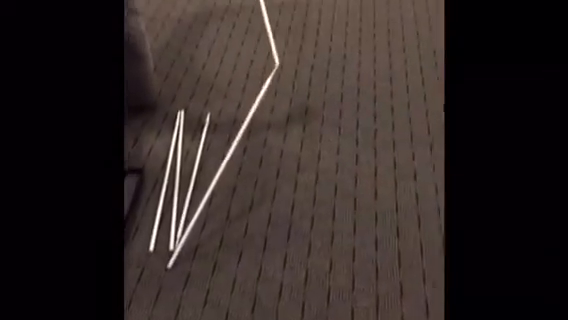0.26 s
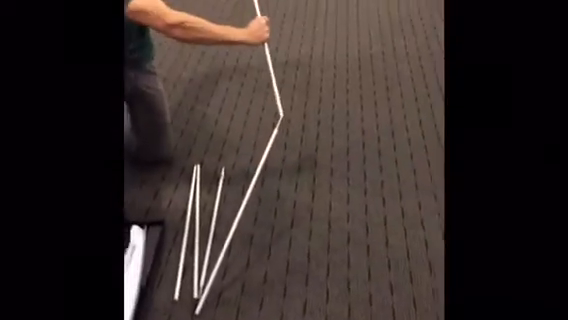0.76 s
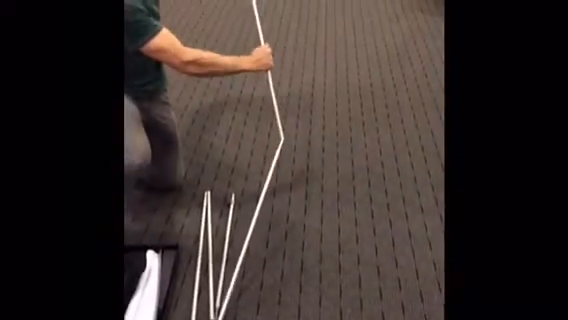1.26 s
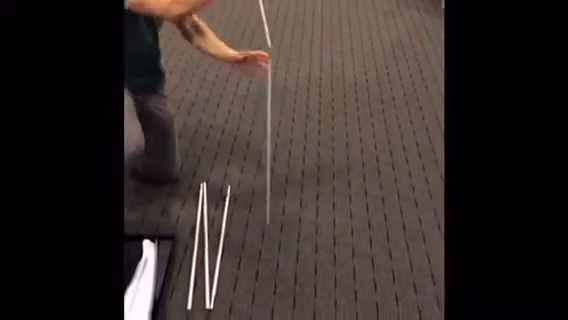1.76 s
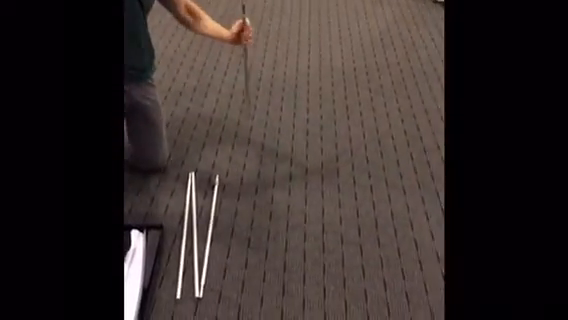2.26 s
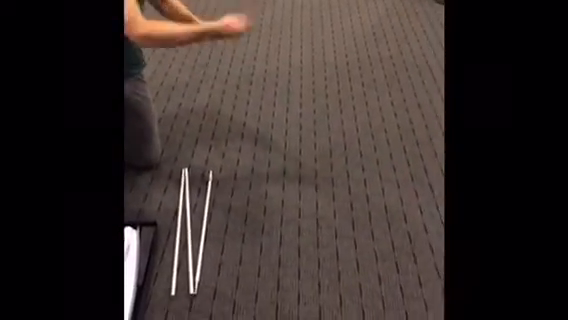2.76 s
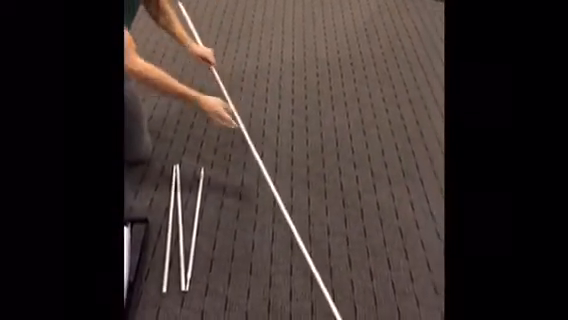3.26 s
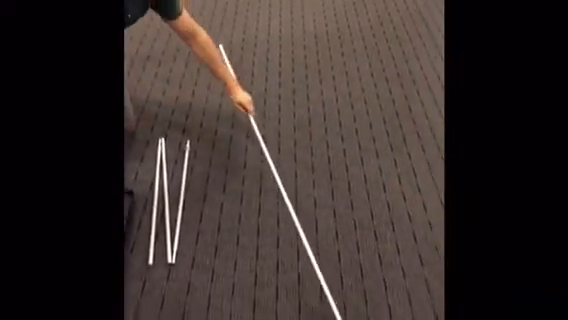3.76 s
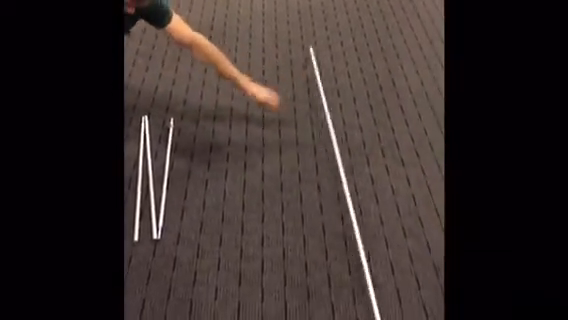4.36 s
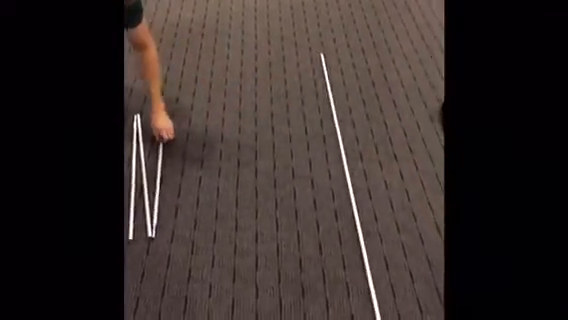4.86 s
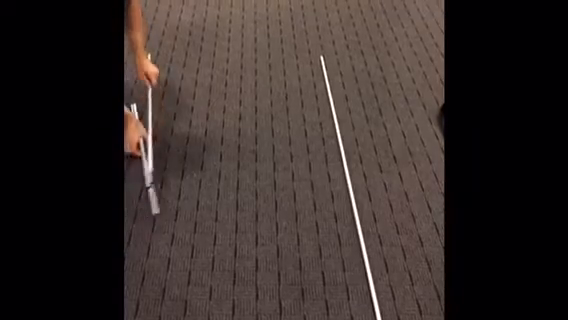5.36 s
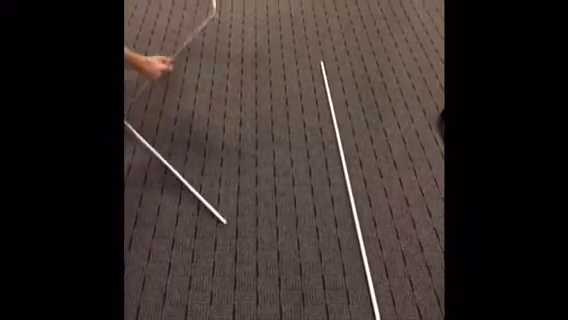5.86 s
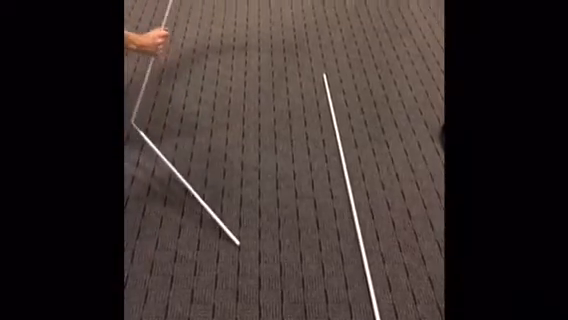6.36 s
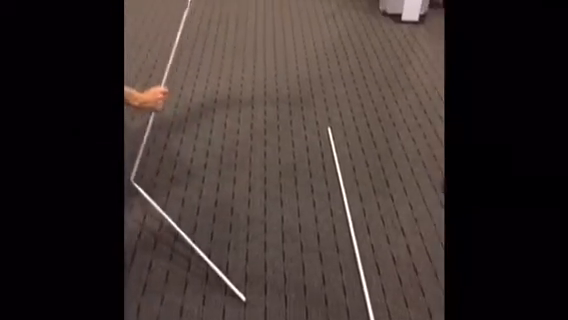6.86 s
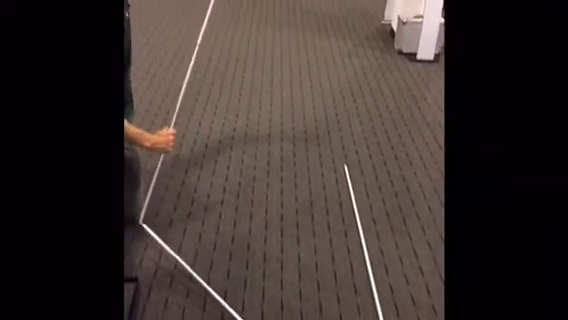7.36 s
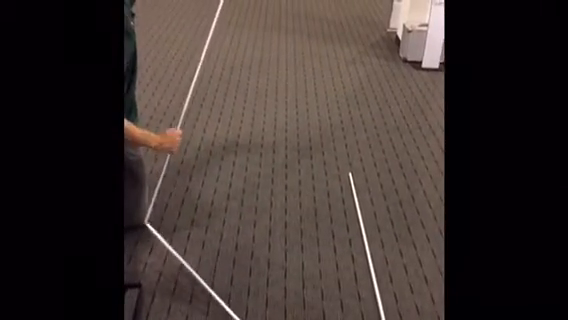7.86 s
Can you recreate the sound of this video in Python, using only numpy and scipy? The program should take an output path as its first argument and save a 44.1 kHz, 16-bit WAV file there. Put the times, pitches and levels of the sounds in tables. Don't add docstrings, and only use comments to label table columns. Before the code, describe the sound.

Thin metal tube sections snap together with sharp bright clicks, a dropped pole chatters on carpet, over steady low ventilation hum indoors.

```python
import sys
import numpy as np
from scipy import signal
from scipy.fft import rfft, irfft, next_fast_len
from scipy.io import wavfile
from scipy.ndimage import minimum_filter1d, map_coordinates

SR = 44100
rng = np.random.default_rng(int(sys.argv[2]) if len(sys.argv) > 2 else 0)


def boost(x):
    u = np.asarray(x, float) / 20
    return 10 ** u


def file_out(sig):
    cols = np.atleast_2d(sig).T
    lim = np.clip(cols, -1, 1)
    pcm = np.round(lim * 32767).astype(np.int16)
    wavfile.write(sys.argv[1], SR, pcm)


N = 358533

# (frequency [Hz], density [dB per Hz])
VENTILATION_SPECTRUM = [(12, -63), (20, -35), (50, -6.5), (123, -5.5), (182, -8.5), (204, -13.5), (234, -9),
                        (270, -13.5), (357, -20), (624, -29), (1370, -33), (2200, -39.5), (3630, -48.5),
                        (7310, -56), (14700, -66.5), (16000, -81.5)]
# (frequency [Hz], level [dB rms], width [Hz])
MAINS_LINES = [(120.14, -41, 1.7), (176.5, -44.5, 1.2), (239.5, -49.5, 2.6), (348.1, -52, 0.6),
               (362, -55.5, 0.67), (7250, -82.5, 25), (7885, -83, 50)]
# (frequency [Hz], density [dB per Hz])
CLOTH_SPECTRUM = [(1500, -29.5), (4000, -7), (8000, -2), (13000, -3.5), (16000, -6)]
# (fastest [s], level [dB], speeding up [s], slowing down [s])
ARM_MOVES = [
    (1.3, -69.5, .25, .6),
    (3, -67.5, .5, .25),
    (3.7, -70, .35, .4),
    (5.35, -64, .35, .3),
    (6.05, -63.5, .35, 0.18),
    (8.12, -52, .04, .04),
]
# (frequency [Hz], level [dB])
IMPACT_SPECTRUM = [(500, -38.5), (1000, -21.5), (2000, -7), (3500, -4.5), (6000, -2), (9000, -8.5),
                   (13000, -15.5), (16000, -29.5)]
# (frequency [Hz], level [dB], t60 [s])
GRIPPED_MODES = [(1160, -15.5, 0.067), (1775, -10.5, 0.23), (1766, -8, 0.14), (2387, -4.5, 0.55),
                 (2436, -11.5, 0.14), (2985, -10, .1), (3203, 7.5, 0.14), (3350, -1, 0.17), (3950, 1, 0.35),
                 (4215, -15, 0.068), (4750, -20.5, 0.09), (5380, -10, 0.18), (5308, 0, 0.3),
                 (5800, -6.5, 0.13), (7310, -6, .15), (8500, -7, 0.18), (9460, -5, 0.11),
                 (10600, -13, 0.16), (12190, -26, 0.065)]
# (time [s], level [dB], low band [dB], high band [dB], rattle length [s])
SLEEVE_JOINTS = [(0.1444, -29.5, -11, -14.5, 0.02), (1.1113, -38, -18, -9, 0.037),
                 (1.121, -32.5, -15, -16, 0.016), (1.176, -34, -16, -17, .035),
                 (1.199, -34, -9, -12.5, 0.041), (1.2027, -15, -16, -6, 0.025),
                 (1.278, -27.5, -11.5, -16.5, 0.068), (2.574, -46.5, -2.5, -8, 0.089),
                 (2.59, -42, -11.5, -15, 0.034), (2.604, -4.5, -30, -4, 0.0066),
                 (2.607, -14.5, -9, -4, 0.021), (2.638, -33.5, -2, 1.5, .069),
                 (2.6599, -19.5, -16, 3, 0.011), (2.733, -27.5, -4, -1.5, 0.054),
                 (7.217, -20.5, -10.5, -11, 0.011), (7.745, -44, -12, -8, .08)]
# (time [s], level [dB], low band [dB], high band [dB])
FLOOR_STRIKES = [(4.3862, -46, -12, -8), (4.4078, -10, -15.5, -14), (4.424, -18.5, -16, -4),
                 (4.43, -16.5, -10.5, -13), (4.437, -18.5, -9.5, -12.5), (4.482, -32, 8.5, -14.5),
                 (4.5078, -27, -1.5, -1), (4.546, -25.5, -5.5, -15), (4.57, -28, -3.5, -12.5),
                 (4.578, -28, -14.5, -29), (4.62, -14, -27, -15), (4.6473, -14.5, -18, -9),
                 (4.667, -15.5, -23, -21), (4.675, -21, -6, -14), (4.7311, -15, -12, -17),
                 (4.745, -20.5, -11, -5), (4.782, -25.5, -9.5, -21.5)]
# (time [s], level [dB], high band [dB])
HAND_TAPS = [(1.15, -46, -16), (1.7345, -61, 0), (1.748, -61, -2), (1.759, -64, 8), (1.818, -44, -16),
             (2.139, -60, -27), (2.418, -45.5, -21), (2.4777, -51, -9), (3.1747, -48, -19.5),
             (3.5402, -40.5, -8.5), (3.565, -56, 1.5), (3.72, -62, -1), (3.7581, -51.5, -11),
             (3.9284, -56.5, -29), (5.016, -59.5, -37.5), (5.1098, -53.5, -26), (5.3482, -54.5, -28),
             (5.385, -54, -22.5), (5.407, -44.5, -23), (5.419, -41, -15), (5.437, -40.5, -16),
             (5.583, -39, -19.5), (5.619, -47, -21), (6.0601, -61.5, -10.5), (6.3954, -61, -21),
             (6.8014, -52, -24), (6.8952, -57, -26), (7.6605, -59, -20.5)]
# (first tick [s], first gap [s], next gap over it [ratio], level [dB])
CORD_SLIPS = [
    (1.39, .046, 1.15, -55),
    (5.862, .035, 1.4, -63.5),
]
# (time [s], level [dB], frequency [Hz], t60 [s])
MODE_PINGS = [(1.283, -30, 3253, 0.16), (5.585, -37, 3230, 0.061), (1.282, -34, 1800, 0.1),
              (2.14, -50, 2660, 0.061), (2.479, -55, 4118, .05), (2.605, -19, 2480, 0.06),
              (2.661, -39, 2430, 0.18), (3.175, -40, 3140, .06), (3.175, -44, 4900, 0.047),
              (3.929, -57, 4870, .05), (4.409, -17, 3182, 0.11), (4.408, -18, 4215, .067),
              (4.634, -23, 4215, .14), (4.629, -23, 2985, .12), (4.951, -46, 3510, .08),
              (5.009, -47, 3140, 0.1), (5.011, -52.5, 4408, .1), (5.109, -49.5, 3170, .05),
              (5.41, -41, 5340, .05), (5.422, -38, 3240, .07), (5.438, -40, 6201, .06),
              (5.437, -55, 2300, .06), (6.396, -54, 3320, 0.043), (6.802, -41, 3300, .035),
              (7.218, -30.5, 2440, 0.044), (1.205, -26.5, 1114, .03)]
# (time [s], level [dB], frequency [Hz], t60 [s])
SOFT_KNOCKS = [
    (1.205, -29.5, 1090, 0.051),
    (4.409, -30.5, 449, .18),
    (4.411, -23.5, 190, 0.46),
    (4.62, -31, 250, 0.31),
    (4.731, -35.5, 293, 0.24),
    (7.218, -38, 995, 0.034),
    (.148, -33.5, 1100, 0.04),
]
# (time [s], level [dB], time to settle [s])
POLE_BOUNCES = [
    (4.409, -24.5, 0.24),
    (4.621, -17, 0.14),
    (4.732, -30, 0.11),
]
# (frequency [Hz], width [Hz], level [dB])
JOINED_MODES = [(1720, 120, -13), (2390, 130, -1.5), (2985, 130, 0.5), (3300, 85, 4.5), (4215, 130, 1),
                (4600, 150, -6), (5260, 160, -11.5), (6400, 270, -4.5), (7040, 270, -10), (8430, 400, -12)]
# (time [s], level [dB], rattle t60 [s], ring [dB])
FREE_SNAPS = [
    (7.7638, -9, 0.2, -0.5),
]
# (frequency [Hz], level [dB], t60 [s])
FREE_MODES = [(710, -23, 0.069), (1163, -12, 0.048), (1730, -21.5, 0.61), (1737, 4.5, 0.064),
              (2020, -17, 0.12), (2360, -8, 0.22), (2420, -1, 0.13), (2837, -16, .2), (3170, -12.5, 0.23),
              (3180, -7.5, 0.19), (3760, -18, 0.145), (3980, -24, 0.6), (4120, 8.5, 0.09), (4300, -21, .15),
              (4650, -20, .15), (5150, -18, 0.4), (5954, -19, 0.34), (7120, -1.5, 0.21), (8250, -13, 0.33),
              (9300, -15, 0.31), (10520, -15, .22), (12190, -26, 0.13)]
# (frequency [Hz], t60 [s])
ROOM_DECAY = [(500, 0.98), (2000, .6), (5000, 0.39), (10000, 0.34), (16000, 0.16)]

JOINT_RING_DB, STRIKE_RING_DB, TAP_RING_DB = -21.5, -14.5, -13
STRIKE_S, DOUBLES_DB = 0.014, 12.5
TAP_LOW_DB, TAP_S = -5, 0.027
SLIP_LOW_DB, SLIP_HIGH_DB, SLIP_S = 2, -5, 0.036
SLIP_FADE_DB = 0.7


def unit(x):
    return x / np.sqrt(np.mean(x ** 2) + 1e-20)


def along(points, hz):
    f, value = np.transpose(points)
    return np.interp(np.log(hz + 1), np.log(f + 1), value)


def wobble(rate, size):
    knots = rng.standard_normal(size // 16)[:int(size * rate / SR) + 4]
    return map_coordinates(knots, [np.arange(size) * rate / SR])


def noise(gain, size):
    m = next_fast_len(size)
    spectrum = rfft(rng.standard_normal(m)) * gain(np.fft.rfftfreq(m, 1 / SR))
    return unit(irfft(spectrum, m)[:size])


def add(track, s, sound):
    part = track[round(s * SR):][:len(sound)]
    part += sound[:len(part)]


def onset(t, rise_s):
    return 1 - np.exp(-t / rise_s)


def ringing(modes, t, scatter_db):
    hz, db, t60 = np.transpose(modes)
    phase = np.exp(2j * np.pi * rng.random(len(hz)))
    strength = boost(db + scatter_db * rng.standard_normal(len(hz))) * phase
    decaying = np.exp(np.outer(t, 2j * np.pi * hz - np.log(1000) / t60))
    return (decaying @ strength).imag * onset(t, 0.00084)


def rattle(colour, size, lumpy_db):
    blows = noise(lambda f: boost(along(IMPACT_SPECTRUM, f) + along(colour, f)), size)
    return unit(boost(lumpy_db * wobble(1100, size)) * blows)


def ventilation():
    level = boost(-36 + 0.65 * wobble(2.3, N))
    hum = level * noise(lambda f: boost(along(VENTILATION_SPECTRUM, f)), N)
    for hz, db, width_hz in MAINS_LINES:
        hum += boost(db) * noise(lambda f: 1 / (1 + ((f - hz) / width_hz) ** 2), N)
    return hum


def rustle():
    t = np.arange(N) / SR
    drag = boost(-78)
    for s, db, rise, fall in ARM_MOVES:
        drag = drag + boost(db - 10 * ((t - s) / np.where(t < s, rise, fall)) ** 2)
    scuffs = boost(2.4 * wobble(35, N) + 2.5 * wobble(400, N))
    hiss = noise(lambda f: boost(along(CLOTH_SPECTRUM, f)), N)
    return boost(-5) * drag * unit(scuffs * hiss)


def contacts():
    joints = [(*row, JOINT_RING_DB) for row in SLEEVE_JOINTS]
    strikes = [(*row, STRIKE_S * 2 ** ((row[1] + 26) / DOUBLES_DB), STRIKE_RING_DB) for row in FLOOR_STRIKES]
    taps = [(s, db, TAP_LOW_DB, high_db, TAP_S, TAP_RING_DB) for s, db, high_db in HAND_TAPS]
    slips = []
    for s, gap, slows, db in CORD_SLIPS:
        for k in range(5):
            tick_s = s + gap * (slows ** k - 1) / (slows - 1)
            slips.append((tick_s, db - SLIP_FADE_DB * k, SLIP_LOW_DB, SLIP_HIGH_DB, SLIP_S, TAP_RING_DB))
    return joints + strikes + taps + slips


def poles():
    track, t = np.zeros(N), np.arange(SR // 12) / SR
    hz, mode_db, t60 = np.transpose(GRIPPED_MODES)
    first_blow = 1 + 0.23 * np.exp(-t / 0.001)
    for s, db, low_db, high_db, length, ring_db in contacts():
        tilt = [(1700, low_db + 10.5), (4500, 0), (11000, high_db + 9.5)]
        fade = boost(-60 * (t / np.clip(length, 0.004, 0.08)) ** 1.75)
        shape = fade * onset(t, 0.0009) * first_blow
        held_hz = hz * (1 + 0.02 * rng.standard_normal(len(hz)))
        held = np.c_[held_hz, mode_db + along(tilt, hz), 0.3 * t60]
        sound = shape * rattle(tilt, len(t), lumpy_db=2.5)
        sound += boost(ring_db - 1.5) * ringing(held, t, scatter_db=5)
        add(track, s, boost(db + 2.1) * sound)
    for s, db, ping_hz, ping_t60 in MODE_PINGS:
        ping = ringing([(ping_hz, db, ping_t60)], t, scatter_db=-0.5)
        add(track, s, ping * np.cos(np.pi / 2 * t / t[-1]))
    return track


def thuds():
    track, t = np.zeros(N), np.arange(SR // 2) / SR
    for s, db, hz, t60 in SOFT_KNOCKS:
        body = noise(lambda f: 1 / (1 + (np.log((f + 1) / hz) / 0.45) ** 4), len(t))
        add(track, s, boost(db - 60 * t / t60) * onset(t, 0.0024) * body)
    return track


def chatter():
    track, t = np.zeros(N), POLE_BOUNCES[0][0] + np.arange(SR // 2) / SR
    shake = np.zeros(len(t))
    for s, db, settle in POLE_BOUNCES:
        age = np.maximum(t - s, 0)
        shake += boost(db - 60 * (age / settle) ** 2) * onset(age, 0.00091)
    knocks = rattle([(1700, 6.0), (4500, -1.5), (11000, -0.5)], len(t), lumpy_db=4.5)
    knocks = knocks * shake * boost(1.6 * wobble(200, len(t)))
    f = np.fft.rfftfreq(len(t), 1 / SR)
    modes = 0
    for k, (centre, width, db) in enumerate(JOINED_MODES):
        resonance = 1j * f * width / (centre * centre - f * f + 1j * f * width)
        modes = modes + (-1) ** k * boost(db) * resonance
    response = boost(-4) + boost(5.0) * modes
    add(track, t[0], irfft(rfft(knocks) * response, len(t)))
    return track


def free_snap():
    track, t = np.zeros(N), np.arange(SR // 2) / SR
    for s, db, t60, ring_db in FREE_SNAPS:
        shape = boost(-60 * t / t60) * onset(t, 0.0007)
        crack = shape * rattle([(1700, 2.4), (11000, 2.3)], len(t), lumpy_db=9.0)
        ring = boost(ring_db - 1.0) * ringing(FREE_MODES, t, scatter_db=1)
        add(track, s, boost(db - 2.0) * (crack + ring))
    return track


def room_tail():
    hz, t, z = signal.stft(rng.standard_normal(SR // 2), SR, nperseg=256)
    decay = boost(-60 * t / along(ROOM_DECAY, hz)[:, None])
    tail = signal.istft(z * decay, SR, nperseg=256)[1]
    tail *= 1 - np.exp(-(np.arange(len(tail)) / SR / 0.0045) ** 2)
    return tail / np.linalg.norm(tail)


def in_room(x, wet_db):
    out, step = x.copy(), SR // 4
    for start in range(0, N, step):
        answer = signal.fftconvolve(x[start:start + step], room_tail())
        add(out, start / SR, boost(wet_db) * answer)
    return out


def scene():
    background = ventilation() + rustle()
    metal = poles() + chatter() + free_snap()
    return (in_room(metal, wet_db=-9.0) + thuds() + background)[None]


def top_cut(x):
    return signal.sosfilt(signal.butter(12, 16540, fs=SR, output="sos"), x)


def record(dry):
    over_db = np.maximum(20 * np.log10(np.abs(dry[0]) + 1e-9) + 9, 0)
    held = -minimum_filter1d(-over_db, size=441)
    attack_s, release_s = 0.031, 0.25
    duck_db = signal.lfilter([1 / (attack_s * SR)], [1, 1 / (release_s * SR) - 1], held)
    x = dry * boost(-0.2 * np.minimum(duck_db, 12))
    x = x / (1 + np.abs(x / 0.98) ** 6) ** (1 / 6)
    m = next_fast_len(N)
    top_hz = 15600
    low_pass = 1 / (1 + (np.fft.rfftfreq(m, 1 / SR) / top_hz) ** 80)
    x = irfft(rfft(x, m) * low_pass, m)[:, :N]
    return top_cut(x)


dry = scene()
out = record(dry)
file_out(out)
```